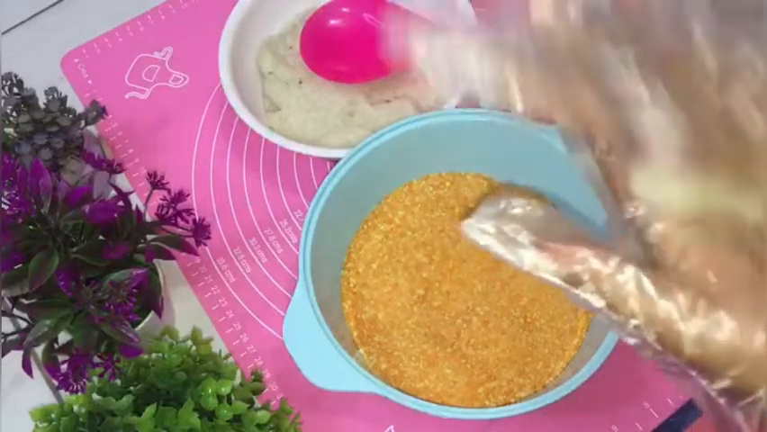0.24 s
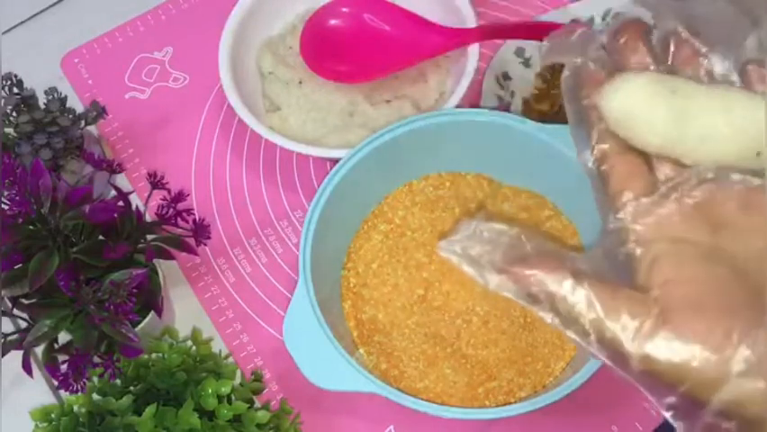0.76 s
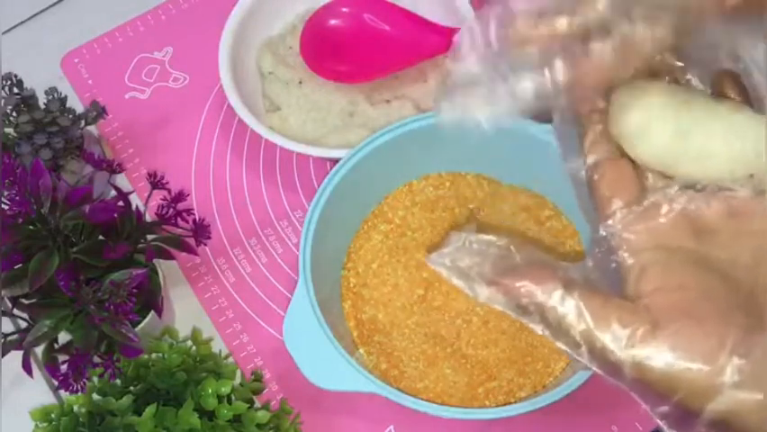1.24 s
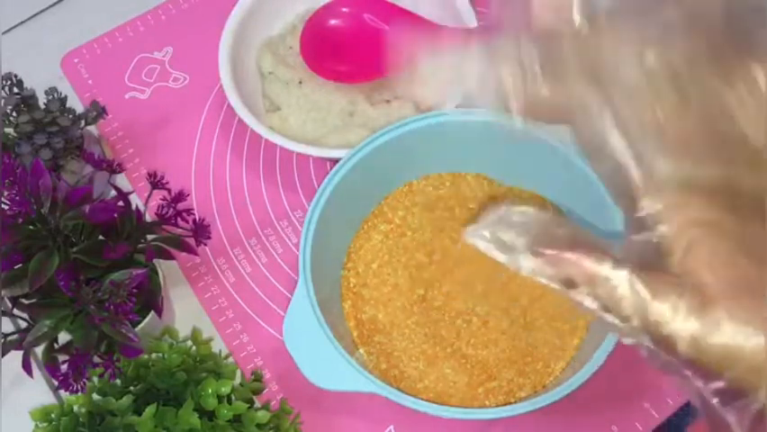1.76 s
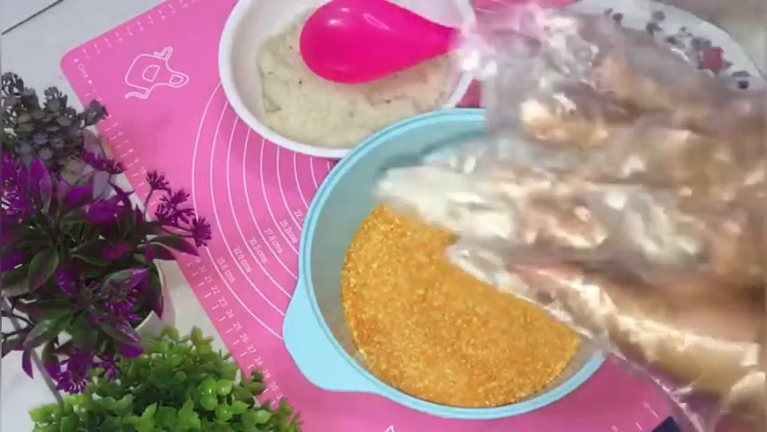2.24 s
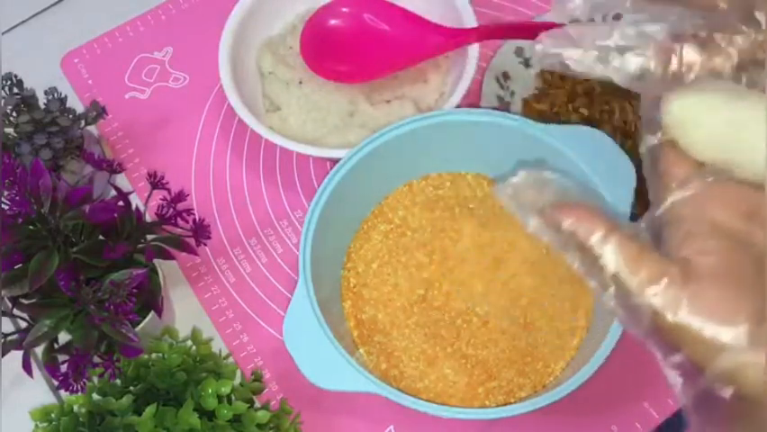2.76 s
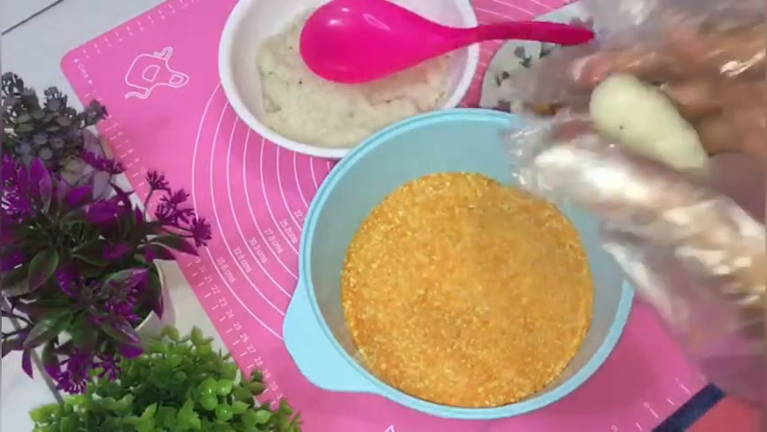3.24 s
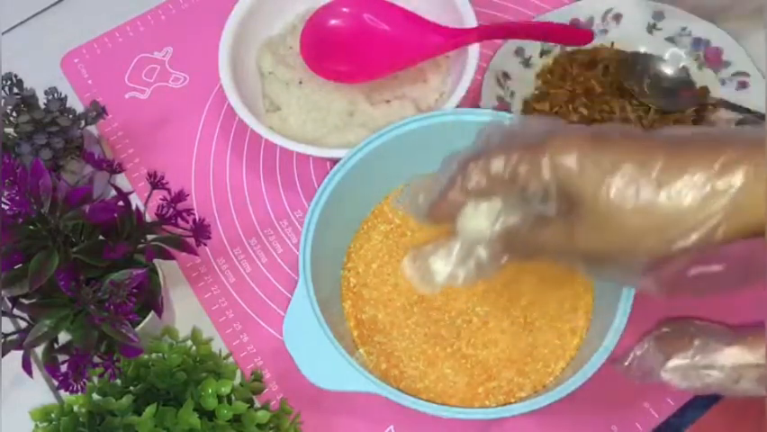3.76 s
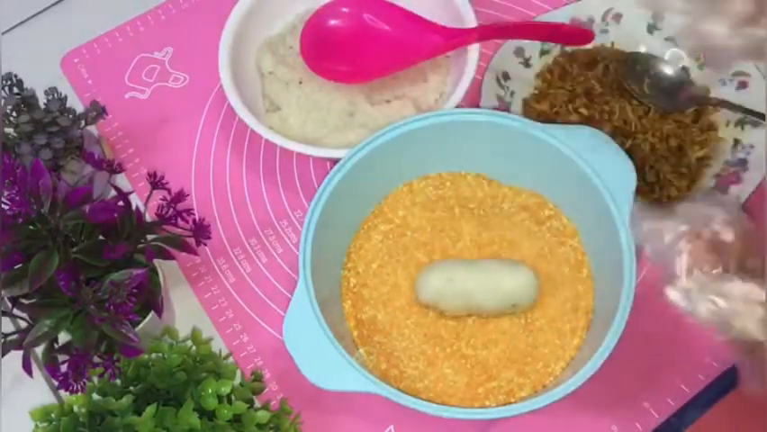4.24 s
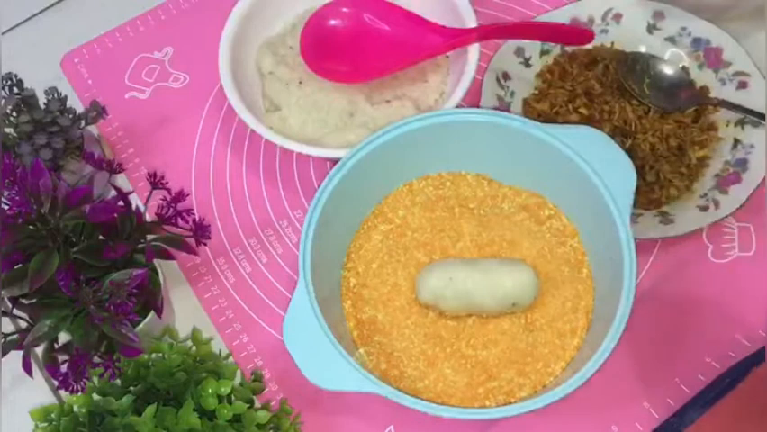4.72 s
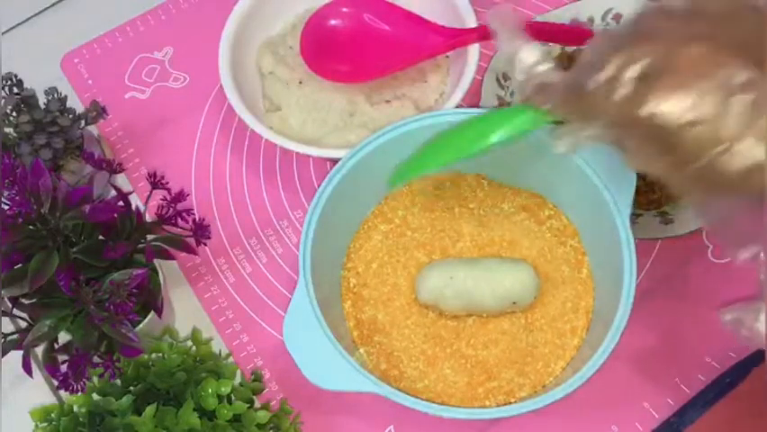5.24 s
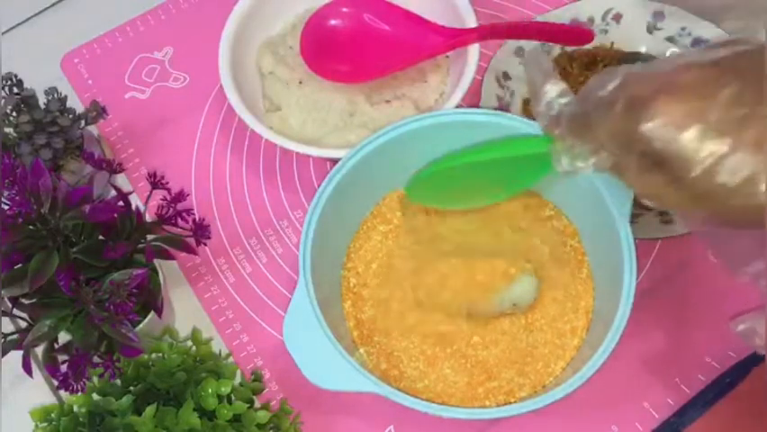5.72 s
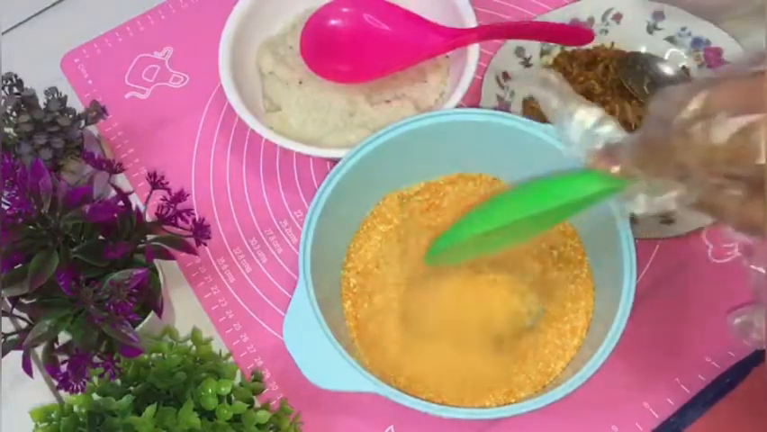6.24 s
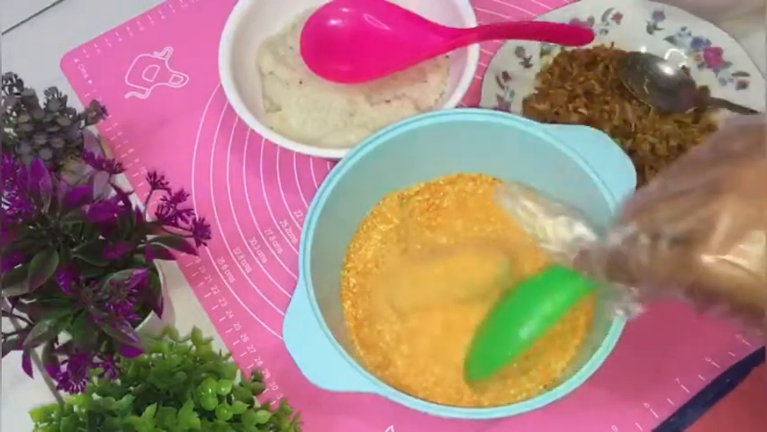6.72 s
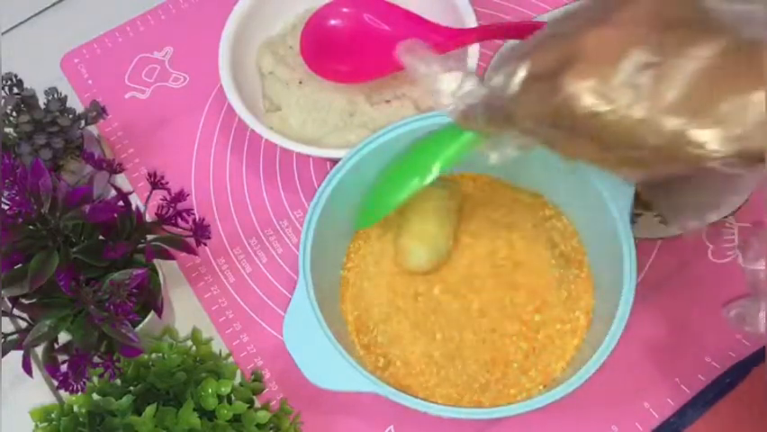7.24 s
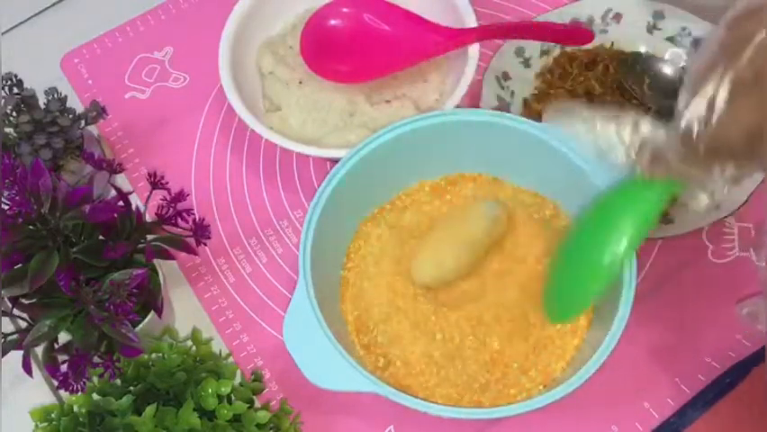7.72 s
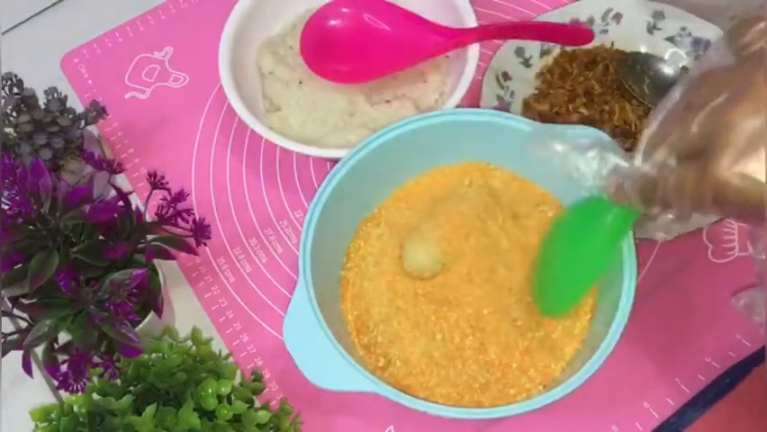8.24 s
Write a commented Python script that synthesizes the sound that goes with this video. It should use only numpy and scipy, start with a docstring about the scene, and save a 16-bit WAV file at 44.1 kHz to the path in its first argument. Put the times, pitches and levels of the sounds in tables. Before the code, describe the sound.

Close to the microphone in a small kitchen, thin plastic gloves crackle in brisk, uneven strokes around a soft rice ball. The rustle thins as the ball is set down, with a few sharp ticks and a faint plastic rub. Then a plastic scoop knocks a plastic bowl and ploughs repeatedly through dry breadcrumbs, with gritty crunches and light sifting. A low motor hum outside swells near the end.

```python
"""Crisp film crackle comes first: thin plastic gloves squeeze a rice ball in quick strokes, put it down and fidget.
Then a plastic scoop knocks on a plastic bowl, ploughs six times through dry breadcrumbs and pours them over the ball.
Film and crumbs are showers of tiny clicks shaped in colour and level; knocks, bumps and rubs are excited resonances.
A small kitchen, close by, adds short reflections; outside a motor hums and swells near the end."""
import sys
import numpy as np
from scipy import signal
from scipy.io import wavfile
from scipy.ndimage import uniform_filter1d

SR = 44100
rng = np.random.default_rng(int(sys.argv[2]) if len(sys.argv) > 2 else 0)


def digitize_waveform(pressure):
    """Quantize a signal to 16-bit integers and store it at the path in sys.argv[1].

    Rows of a 2-D input are taken as channels; values are limited to [-1, 1].
    """
    field = np.atleast_2d(pressure).T
    bounded = np.clip(field, -1, 1)
    quanta = np.round(bounded * 32767).astype(np.int16)
    wavfile.write(sys.argv[1], SR, quanta)


N = 373968
TIME = np.arange(N) / SR
CUTOFF_HZ = 12000
HANDLING_FADE_S = 0.045
KITCHEN_T60_S = 0.33


def from_db(db):
    """Decibels to gain."""
    return np.exp(np.asarray(db) * np.log(10) / 20)


def rms_one(x):
    """Scale to unit power."""
    return x / np.sqrt(np.mean(x ** 2) + 1e-20)


def butter(x, hz, kind, order=2):
    """Causal Butterworth filter."""
    return signal.sosfilt(signal.butter(order, hz, kind, fs=SR, output="sos"), x + 1e-18)


def drift(per_s):
    """Smooth chance with spread 1."""
    knots = rng.standard_normal(int(N / SR * per_s) + 2)
    return rms_one(np.interp(TIME * per_s, np.arange(len(knots)), knots))


def coloured(spectrum, excite):
    """Third-octave bands, each fed by a fresh call of excite and weighted by the spectrum; rms 1."""
    hz, db = np.transpose(spectrum)
    edges = 12400 / 2 ** (np.arange(27, -1, -1) / 3)
    out = np.zeros(N)
    for low, high in zip(edges, edges[1:]):
        if high > hz[0] and low < hz[-1]:
            weight = from_db(np.interp(np.log(low * high) / 2, np.log(hz), db))
            out += weight * butter(excite(), [low, high], "band")
    return rms_one(out)


def grains(spectrum, per_s, spread_db, even_s, patchy_db, after):
    """Tiny clicks of very unequal size, each coloured and briefly fluttering after; level steady over even_s."""
    at = np.flatnonzero(rng.random(N) < per_s / SR)
    sizes = from_db(spread_db * np.minimum(rng.exponential(1, len(at)), 4.5))
    fall = np.exp(-1 / (.002 * SR))  # the flutter's power decays over 2 ms
    power_after = signal.lfilter([1 - fall], [1, -fall], np.bincount(at, sizes ** 2, N) + 1e-18)
    flutter = after * np.sqrt(power_after)
    noise = rng.standard_normal(2 * N)

    def excite():
        """The strikes that reach one band; its share wanders as the shape of the source changes."""
        clicks = np.bincount(at, sizes * rng.standard_normal(len(at)), N)
        shifted_noise = noise[rng.integers(N):][:N]
        return (clicks + flutter * shifted_noise) * from_db(patchy_db * drift(35))

    x = coloured(spectrum, excite)
    width = max(int(even_s * SR), 2)
    power = uniform_filter1d(uniform_filter1d(x ** 2, width), width)
    return x / np.sqrt(np.maximum(power, 0) + 1e-3)


def ring(x, hz, t60):
    """A unit click sets a sine of height about 1 ringing; it falls 60 dB in t60 seconds."""
    r, w = from_db(-60 / (t60 * SR)), 2 * np.pi * hz / SR
    return signal.lfilter([0, np.sin(w)], [1, -2 * r * np.cos(w), r * r], x)


def add(out, s, peak_db, sound):
    """Place a short sound at time s with the given peak."""
    i = int(s * SR)
    out[i:i + len(sound)] += (from_db(peak_db) * sound / np.abs(sound).max())[:N - i]


def swell(s, length):
    """A stroke grows and eases off around time s; peak 1, length at half strength."""
    shape = 1.85  # 1 is pointed, 2 is bell-shaped
    return .5 ** np.minimum(np.abs(2 * (TIME - s) / length) ** shape, 40)


def strokes(rows):
    """Gain in time for each dB column of a table of strokes; overlapping strokes add in power."""
    power = sum(from_db(db)[:, None] ** 2 * swell(s, length) ** 2 for s, length, *db in rows)
    return np.sqrt(power)


def glove(creases_per_s=6500, crackle_db=0, fold_db=2, facet_db=-10, handling_db=0.39):
    """A harder squeeze buckles more creases a second; larger folds flap over more slowly and lower."""
    # Squeezes of the gloved hand. Each row: tightest grip in seconds, length at half strength in seconds,
    # crackle in dB before crackle_db, flapping of whole folds in dB before fold_db.
    squeezes = [(.04, 0.091, -25.5, -48), (.182, 0.092, -26, -48), (.322, 0.093, -25.5, -48.5),
                (.464, 0.099, -27, -46.5), (.588, 0.069, -25, -43), (.659, 0.085, -25.5, -40),
                (.757, 0.088, -34, -55), (.838, 0.076, -33, -51.5), (.965, 0.094, -30.5, -46.5),
                (1.075, 0.086, -36, -54.5), (1.172, 0.067, -34.5, -49.5), (1.25, 0.13, -36.5, -54),
                (1.422, 0.062, -30, -45.5), (1.495, 0.13, -37.5, -53.5), (1.665, 0.086, -26, -43.5),
                (1.807, 0.1, -25.5, -48), (1.958, 0.096, -25, -46), (2.105, .081, -23, -52),
                (2.246, 0.12, -25.5, -46.5), (2.396, 0.081, -21.5, -43.5), (2.463, 0.072, -28, -47),
                (2.634, 0.17, -31, -54.5), (2.788, 0.064, -25.5, -46), (2.87, .13, -34.5, -52.5),
                (2.989, .048, -28, -50), (3.054, .049, -29, -45), (3.905, 0.074, -29, -47.5),
                (3.983, 0.089, -39.5, -60)]
    # Unbroken rustle as the ball is turned over, then as the gloves are adjusted: one list for each stretch.
    # Each row: time in seconds, crackle in dB, fold flapping in dB, both before handling_db and the levels above.
    rustling = [
        [(3.09, -36, -55), (3.228, -35, -60), (3.274, -31, -51), (3.498, -35, -54.5), (3.534, -34, -52),
         (3.596, -40, -68), (3.616, -39.5, -55), (3.678, -43, -69), (3.745, -38, -61)],
        [(4.1, -63, -81), (4.116, -48, -68), (4.244, -30, -68), (4.356, -37.5, -60), (4.396, -33, -52.5),
         (4.802, -33, -56.5), (4.81, -33.5, -46.5), (5.138, -31, -57), (5.315, -37, -58.5)],
    ]
    # Colour of the film's creases. Each row: frequency in Hz, relative level in dB per Hz.
    crease_spectrum = [(300, -18.5), (600, -23), (900, -7.5), (1600, -2.5), (2200, -1.5), (3200, -1),
                       (4400, 0), (5700, 2), (7500, -.5), (9000, 1), (11000, -1)]
    # Colour of the larger folds. Each row: frequency in Hz, relative level in dB per Hz.
    fold_spectrum = [(90, -27), (170, -5), (240, -6.5), (330, 1.5), (520, -4), (800, -3.5), (1500, -2.5)]

    rustle = from_db(handling_db) * sum(handling(rows) for rows in rustling)
    crackle, folds = np.sqrt(strokes(squeezes) ** 2 + crumpling() ** 2 + rustle ** 2)
    # the film never quite rests until the scoop is in hand
    grip_db, grip_until_s = -50, 5.3
    grip = from_db(grip_db) * np.clip((grip_until_s - TIME) / HANDLING_FADE_S + 1, 0, 1)
    crackle = np.hypot(crackle, grip)
    per_s = creases_per_s * (crackle / crackle.max() + .03) ** .6
    fits = from_db(crackle_db + 0.56 * drift(45))  # creases give way in clusters
    film = grains(crease_spectrum, per_s, spread_db=1.4, even_s=0.024, patchy_db=1.5, after=1.0)
    film = film + from_db(facet_db) * facets()
    flaps = grains(fold_spectrum, 600, spread_db=2.5, even_s=0.04, patchy_db=3.0, after=0.65)
    return fits * crackle * film + from_db(fold_db) * folds * flaps


def handling(rows):
    """Crackle and fold gains of one stretch of rustling, faded at both ends."""
    s, *columns = np.transpose(rows)
    fade = np.clip(1 + np.minimum(TIME - s[0], s[-1] - TIME) / HANDLING_FADE_S, 0, 1)
    return np.array([fade * from_db(np.interp(TIME, s, db)) for db in columns])


def crumpling():
    """The film gives way all at once: crackle and fold gains rise shortly, then fall exponentially."""
    # Sudden crumples. Each row: start in seconds, attack in seconds, decay in seconds,
    # crackle in dB, flapping of whole folds in dB, both before the glove's own levels.
    crumples = [(1.334, 0.02, 0.023, -24.5, -40), (1.567, .026, .043, -24.5, -41),
                (2.887, 0.00627, 0.0135, -31, -41), (3.769, .003, 0.0072, -27, -57)]
    out = np.zeros((2, N))
    for s, attack, decay, *db in crumples:
        t = TIME - s
        fall = np.exp(-np.clip((t - attack) / decay, 0, 20))
        out += from_db(db)[:, None] * np.clip(t / attack, 0, 1) * fall
    return out


def facets(per_s=450, cycles=28):
    """Taut patches of film ring for a moment, each at its own pitch, before they buckle again."""
    out, t = np.zeros(N), TIME[:SR // 25]
    for when, size, pitch in rng.random((int(per_s * N / SR), 3)):
        hz = 1800 * 6 ** pitch
        i = int(when * (N - len(t)))
        out[i:i + len(t)] += size * np.sin(2 * np.pi * hz * t) * np.exp(-t * hz / cycles) * np.sqrt(hz)
    return rms_one(out)


def sharp_ticks(decay_s=.0013, low_hz=2500, level_db=2):
    """Bright ticks a few milliseconds long, from film creases and then crumbs: decaying bursts of high noise."""
    # Single sharp ticks: glove film creases at first, then crumbs among the scoop strokes.
    # Each row: start in seconds, peak in dB before level_db.
    ticks = [(0.1285, -33), (0.2881, -14), (0.573, -27), (1.3424, -19.5), (1.5743, -19), (2.766, -25),
             (2.8944, -24), (2.975, -25), (3.057, -16), (3.701, -27), (3.746, -36), (3.77, -34),
             (3.888, -26), (4.6629, -13), (4.7779, -29), (5.7257, -36), (5.771, -34), (5.8045, -33),
             (6.235, -26), (6.2967, -39), (6.338, -31), (6.969, -27), (7.185, -38), (7.3116, -29.5)]
    out, t = np.zeros(N), TIME[:SR // 50]
    for (s, peak_db), burst in zip(ticks, rng.standard_normal((len(ticks), len(t)))):
        tick = butter(burst * np.exp(-t / decay_s), [low_hz, CUTOFF_HZ], "band")
        add(out, s, peak_db + level_db, tick)
    return out


def soft_bumps(t60=0.028):
    """A short puff of noise excites one low, quickly damped resonance, heard as a soft bump or short rub."""
    # Soft low bumps of the ball, and later short low rubs as the scoop works.
    # Each row: start in seconds, peak in dB, pitch in Hz.
    touches = [(.645, -36, 469), (0.666, -38, 383), (2.09, -28, 377), (2.102, -32.5, 292.6),
               (2.383, -33.5, 346), (6.575, -36, 340), (6.76, -45, 430), (6.791, -47, 379),
               (7.336, -49, 317.6), (7.375, -46, 315)]
    out, t = np.zeros(N), TIME[:SR // 8]
    for (s, peak_db, hz), puff in zip(touches, rng.standard_normal((len(touches), len(t)))):
        touch = ring(puff * np.exp(-t / 0.011), hz, t60)
        add(out, s, peak_db, butter(touch, 114, "high"))
    return out


def crumbs(hiss_db=2.0, crunch_db=-1):
    """Loose grains tick on top of the heap, while the packed ones grind against the bowl wall."""
    # Crumbs slide off the tilted scoop. Each row: middle in seconds, length at half strength in seconds,
    # hiss in dB before hiss_db.
    sifts = [(5.92, .06, -37), (6.175, 0.086, -48.5), (6.41, 0.1, -44.5), (6.53, .12, -41),
             (6.99, .04, -51.5), (7.47, 0.0525, -49), (7.538, 0.049, -50.5), (7.671, .04, -43),
             (7.74, 0.13, -43)]
    # Colour of the loose top grains. Each row: frequency in Hz, relative level in dB per Hz.
    hiss_spectrum = [(700, -32), (1500, -23), (2700, -3), (4000, -0.5), (6000, 1), (8500, -0.5),
                     (11000, -2)]
    # Colour of the packed crumbs, before the bowl. Each row: frequency in Hz, relative level in dB per Hz.
    crunch_spectrum = [(200, -17.5), (340, -6.5), (490, -8), (680, -2.5), (860, -2), (1100, -2.5),
                       (1450, -3), (1800, 0), (2300, -4), (2900, -2), (4500, -6), (9000, -36.5)]
    # Half-full bowl colouring the grinding crumbs. Each row: centre in Hz, width in Hz, lift in dB.
    hollows = [(930, 160, 5), (1400, 430, 5), (2290, 480, 7)]

    landing_crunch_db = -8.5  # against the hiss of the same sift
    sifting = strokes(sifts) * from_db([[0], [landing_crunch_db]])
    hiss, crunch = np.hypot(ploughing(), sifting)
    per_s = 8000 * (hiss / hiss.max() + .04) ** .9
    top = grains(hiss_spectrum, per_s, spread_db=2.5, even_s=0.024, patchy_db=1.5, after=0.92)
    grind = grains(crunch_spectrum, 3500, spread_db=2.0, even_s=.025, patchy_db=1.0, after=0.48)
    for hz, width_hz, lift_db in hollows:
        resonance = signal.lfilter(*signal.iirpeak(hz, hz / width_hz, fs=SR), grind)
        grind = grind + (from_db(lift_db) - 1) * resonance
    return from_db(hiss_db) * hiss * top + from_db(crunch_db) * crunch * rms_one(grind)


def ploughing():
    """Hiss and crunch gains of the scoop: attack, hold, an even fade in dB, and a quick end as it lifts."""
    # The scoop ploughs in, pushes, runs out and lifts. Each row: start in seconds, attack in seconds,
    # hold in seconds, lift after so many seconds, hiss of the top grains in dB, its fade in dB per second,
    # crunch of the heap in dB, its fade in dB per second; levels before those of the crumbs.
    scoops = [(5.328, 0.012, 0.091, 0.5, -31.5, 146, -31, 152),
              (5.799, .014, .042, .3, -37.5, 213, -35, 102), (6.554, .03, 0.027, .36, -35.5, 30, -36, 39),
              (7.307, 0.00401, .06, 0.25, -41, 119, -39.5, 113.5),
              (7.852, 0.029, .02, .3, -38.5, 64, -33.5, 58), (8.25, 0.033, 0.031, 0.15, -43.5, 73, -39, 99)]
    lift_db_per_s = 244  # extra fade once the scoop has left the heap
    out = np.zeros((2, N))
    for s, attack, hold, lift, hiss_db, hiss_fade, crunch_db, crunch_fade in scoops:
        t = TIME - s
        loss_db = np.outer([hiss_fade, crunch_fade], np.maximum(t - attack - hold, 0))
        loss_db = loss_db + lift_db_per_s * np.maximum(t - lift, 0)
        fade = from_db(-np.minimum(loss_db, 120))
        out += from_db([[hiss_db], [crunch_db]]) * np.clip(t / attack, 0, 1) * fade
    return out


def strays(level_db=-64.0, per_s=600, start_s=5.55, low_hz=2200, high_hz=11000):
    """Once the heap is stirred, lone crumbs keep dropping from the scoop and settling."""
    at = np.flatnonzero((rng.random(N) < per_s / SR) & (TIME > start_s))
    sizes = from_db(2.5 * np.minimum(rng.exponential(1, len(at)), 2.5)) * rng.standard_normal(len(at))
    clicks = np.bincount(at, sizes, N)
    ticks = rms_one(butter(clicks, [low_hz, min(high_hz, CUTOFF_HZ)], "band", order=1))
    return from_db(level_db) * kitchen(ticks, t60=.1, wet_db=2, wall_hz=9000)


def knocks(bending=0.515, count=6):
    """The scoop taps the damped bowl; bending waves carry the highs first, so each tap chirps downward."""
    # Scoop against bowl. Each row: start in seconds, peak in dB, brightness of the contact in Hz.
    taps = [(5.3240, -12, 4250), (6.5683, -11.5, 2280), (7.87, -9, 2300), (7.88, -13.5, 3030),
            (8.2508, -20.5, 1380)]
    # Ring of bowl and scoop. Each row: frequency in Hz, relative level in dB before chance, t60 in seconds.
    modes = [(348, -6.5, 0.013), (755, -5.5, 0.021), (950, 0.5, 0.0074), (1550, 1, 0.01),
             (1750, -0.5, 0.0074), (2130, 3, 0.016), (2560, -4, 0.013), (3350, -6, 0.019),
             (4180, 2, 0.0062)]
    out, tap = np.zeros(N), signal.unit_impulse(SR // 10)
    lag = np.clip(bending, 0, .95)
    for _ in range(count):  # all-pass chain: lows arrive later
        tap = signal.lfilter([-lag, 1], [1, -lag], tap)
    tap = butter(tap, 600, "high")
    signs = (-1) ** np.arange(len(modes))  # neighbouring modes swing against each other
    for (s, peak_db, contact_hz), chance in zip(taps, rng.standard_normal((len(taps), len(modes)))):
        push = butter(tap, contact_hz, "low")
        strengths = signs * from_db(chance)
        knock = sum(own * from_db(db) * ring(push, hz, t60) for (hz, db, t60), own in zip(modes, strengths))
        add(out, s, peak_db, knock)
    return out


def rubs(sharpness=4.4, rough_db=3.0):
    """Uneven slips excite one broad resonance of the sliding plastic, swelling and fading."""
    # Plastic drags with a narrow, hollow rasp. Each row: middle in seconds, length at half strength in seconds,
    # level in dB, pitch in Hz.
    drags = [(4.616, 0.63, -51.5, 662), (4.82, 0.17, -38.5, 2606), (5.57, .12, -52.5, 2145),
             (6.034, 0.13, -53.5, 2550), (6.149, 0.023, -48, 2550), (6.527, 0.12, -52, 1330),
             (7.454, 0.13, -50, 2440)]
    out, slips = np.zeros(N), rng.standard_normal(N) * from_db(rough_db * drift(150))
    for s, length, db, hz in drags:
        envelope = np.cos(np.pi / 2 * np.clip((TIME - s) / length, -1, 1)) ** 2
        peak = signal.iirpeak(hz, sharpness / 2, fs=SR)
        rasp = signal.lfilter(*peak, signal.lfilter(*peak, slips))
        out += from_db(db) * envelope * rms_one(rasp)
    return out


def thuds(half_width_octaves=0.6):
    """Soft, pitchless bumps: a band of low noise that swells and fades."""
    # Dull swells and thuds in the bass while the hands work. Each row: middle in seconds,
    # length at half strength in seconds, level in dB, centre in Hz.
    bumps = [(.16, 0.62, -53, 100), (1.18, 0.21, -47.5, 90), (2.1, 0.057, -40.5, 179),
             (2.42, .12, -54, 170), (2.75, 0.43, -52, 70), (3.07, 0.085, -52, 179.9),
             (3.975, .03, -44, 130), (5.39, 0.1, -44, 184.8), (7.12, 0.12, -52, 100.5)]
    out, width = np.zeros(N), 2 ** half_width_octaves
    for s, length, db, hz in bumps:
        low_noise = butter(rng.standard_normal(N), [hz / width, hz * width], "band")
        out += from_db(db) * swell(s, length) * rms_one(low_noise)
    return out


def background(floor_db=-60, rumble_db=-59, hum_db=-1, octave_db=-17, waver_db=-0.5):
    """Room tone, with the low rumble and wavering firing tone of a motor outside."""
    # The motor's firing tone. Each row: time in seconds, frequency in Hz, level in dB before hum_db.
    firing = [(0, 78.5, -75), (3.5, 77.5, -58), (4, 76.7, -56.5), (6.2, 77.6, -61.5), (7.1, 79.1, -54.5),
              (7.6, 79.4, -55.5), (7.8, 79.76, -41.5), (8.15, 81.6, -46), (8.48, 81.5, -46.5)]
    # Colour of the room tone. Each row: frequency in Hz, relative level in dB per Hz.
    room_spectrum = [(30, -22), (50, -1), (75, 3.5), (110, -3), (165, 0), (240, -12.5), (400, -8.5),
                     (800, -19), (2000, -13.5), (6000, -63), (12000, -11.5)]

    def white():
        """Fresh white noise."""
        return rng.standard_normal(N)

    s, hz, db = np.transpose(firing)
    phase = 2 * np.pi * np.cumsum(np.interp(TIME, s, hz)) / SR
    tone = np.sqrt(2) * (np.sin(phase) + from_db(octave_db) * np.sin(2 * phase))
    hum = from_db(np.interp(TIME, s, db) + hum_db + waver_db * drift(24))
    rumble = rms_one(butter(white(), [55, 170], "band", order=3))
    room = coloured(room_spectrum, white)
    return from_db(floor_db) * room + from_db(rumble_db) * rumble + hum * tone


def kitchen(x, t60=.25, wet_db=-11, wall_hz=7000):
    """Dense reflections from table and walls follow within milliseconds and die quickly."""
    t = TIME[:SR // 2]
    tail = rng.standard_normal(len(t)) * from_db(-60 * t / t60) * (t > .002)
    tail = butter(tail, min(wall_hz, SR / 3), "low", order=1)
    return x + from_db(wet_db) * signal.fftconvolve(x, tail / np.linalg.norm(tail))[:N]


def scene():
    """Gloves, crumbs and bowl in the kitchen, over thuds, stray crumbs and the background."""
    hands_and_crumbs = glove() + soft_bumps() + sharp_ticks() + rubs() + crumbs()
    near = kitchen(hands_and_crumbs, t60=KITCHEN_T60_S, wet_db=-17.5, wall_hz=7150)
    bowl = kitchen(knocks(), t60=KITCHEN_T60_S, wet_db=-10.5, wall_hz=4950)
    return (near + bowl + thuds() + strays() + background())[None]


def record(dry):
    """The microphone port has two narrow dips; the top is cut steeply."""
    for hz, q, depth in [(4930, 10.7, 0.27), (10960, 37, 0.69)]:
        dry = dry - depth * signal.lfilter(*signal.iirpeak(hz, q, fs=SR), dry)
    return signal.sosfilt(signal.ellip(10, .2, 80, CUTOFF_HZ, fs=SR, output="sos"), dry)


dry = scene()
out = record(dry)
digitize_waveform(out)
```